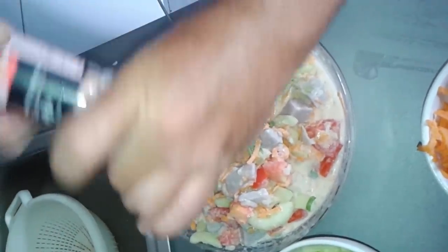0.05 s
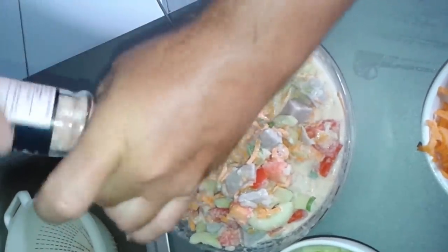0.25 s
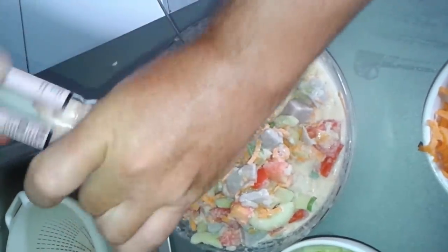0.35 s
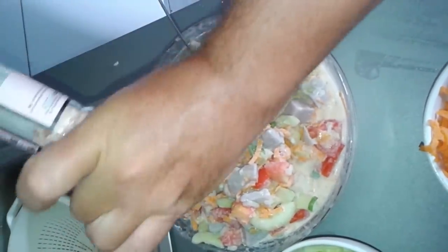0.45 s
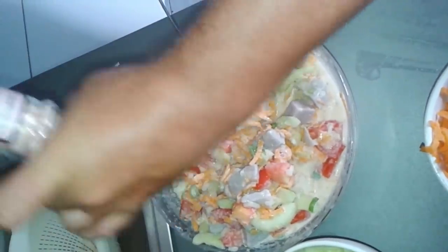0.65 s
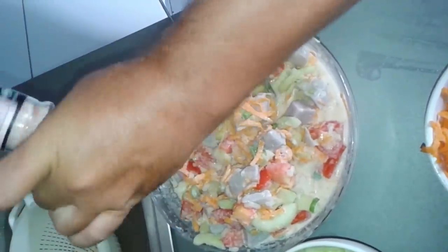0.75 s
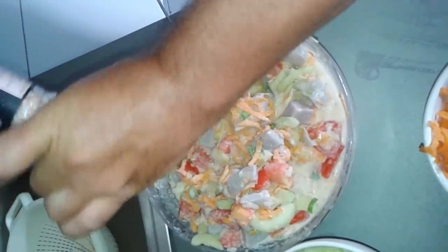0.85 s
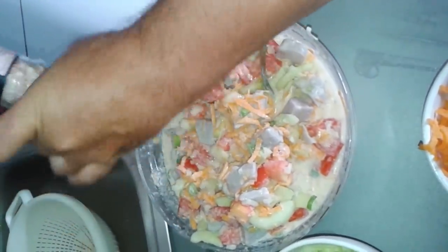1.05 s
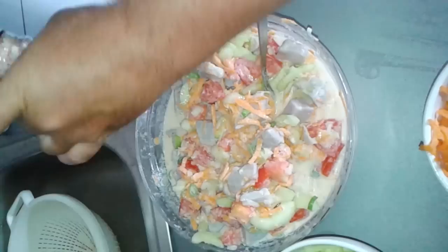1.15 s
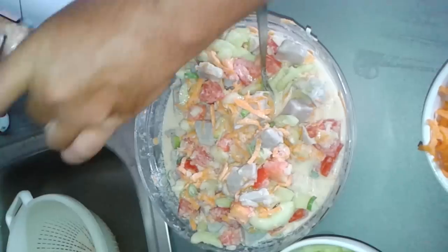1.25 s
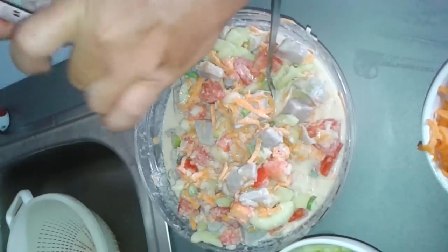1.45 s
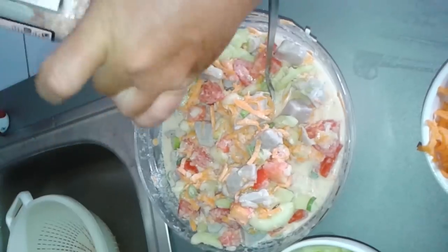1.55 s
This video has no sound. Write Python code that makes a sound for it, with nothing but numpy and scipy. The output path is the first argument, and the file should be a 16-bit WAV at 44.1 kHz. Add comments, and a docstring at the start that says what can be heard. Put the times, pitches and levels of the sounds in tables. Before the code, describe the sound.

A hand salt grinder crunches close by in three short twists, at about 0.2, 0.7 and 1.1 seconds. Each is a gritty rasp of roughly a quarter second, with coarse crystals cracking in the plastic head. Faint finger taps and ticks of loose crystals come at the start, between twists and around 1.5 seconds. The kitchen rings briefly over a soft, low appliance hum.

```python
"""Salt grinder in a tiled kitchen

A hand grinder is twisted three times over a bowl, close by. In each twist the burr crushes a stream
of grit and a few coarse crystals crack; both ring the plastic head. Between twists fingers tap and
loose crystals tick in the jar. The room rings for half a second over a low appliance hum."""
import sys
import numpy as np
from scipy import signal
from scipy.fft import rfft, irfft, next_fast_len
from scipy.io import wavfile
from scipy.ndimage import map_coordinates

SR = 44100
rng = np.random.default_rng(int(sys.argv[2]) if len(sys.argv) > 2 else 0)


def persist_wave(psi):
    """Save psi, clipped to +-1, as 16-bit WAV."""
    counts = np.round(np.clip(psi, -1, 1) * 32767).astype(np.int16)
    wavfile.write(sys.argv[1], SR, np.atleast_2d(counts).T)


N = 70560
PREROLL = SR // 2  # samples


def amp(db):
    """Decibels to gain."""
    return 10 ** (np.asarray(db) / 20)


def unit(x):
    """Scale to rms 1."""
    return x / np.sqrt(np.mean(x ** 2) + 1e-20)


def along(points, hz):
    """Interpolate (f/Hz, value) points on a log frequency axis."""
    f, v = np.transpose(points)
    return np.interp(np.log(hz + 1), np.log(f + 1), v)


def wobble(knots_per_s, size):
    """Smooth random curve."""
    knots = rng.standard_normal(int(size * knots_per_s / SR) + 4)
    return map_coordinates(knots, [np.arange(size) * knots_per_s / SR])


def filtered(x, response):
    """Zero-phase filter with gain response(hz)."""
    m = next_fast_len(N + SR // 2)
    return irfft(rfft(x, m) * response(np.fft.rfftfreq(m, 1 / SR)), m)[..., :N]


def add(track, start_s, x):
    """Mix x into a track that begins PREROLL early."""
    i = round(start_s * SR) + PREROLL
    track[i:i + len(x)] += x[:len(track) - i]


# Room noise spectrum: f/Hz, relative density/dB
NOISE_SPECTRUM = [(25, -15.5), (100, -8), (135, -3), (250, -2), (460, -13.5), (800, -15.5), (1300, -20),
                  (2300, -17), (4500, -27.5), (6800, -19), (8500, -23.5), (15000, -32)]

def room_noise(level_db=-53):
    """Soft, steady noise, strongest in the bass."""
    noise = filtered(rng.standard_normal(N), lambda hz: amp(along(NOISE_SPECTRUM, hz)))
    return amp(level_db) * unit(noise)


# Hum partials: f/Hz, level/dB
HUM_PARTIALS = [(153, -58), (265, -63)]

def appliance_hum(drift_rad=0.26, waver_db=3):
    """Two low tones wavering in phase and level."""
    t = np.arange(N) / SR
    out = np.zeros(N)
    for hz, db in HUM_PARTIALS:
        tone = np.sin(2 * np.pi * hz * t + drift_rad * wobble(32, N))
        out += amp(db) * unit(tone * amp(waver_db * wobble(13.96, N)))
    return out


# Room decay: f/Hz, T60/s
KITCHEN_DECAY = [(200, 0.9), (900, 0.56), (2200, 0.43), (6000, 0.41), (10000, 0.33), (15000, 0.21)]

def kitchen(x, room_db=-5, onset_s=0.0062, near_db=-1.5, near_s=0.0046):
    """Direct sound, scatter off hands, bowl and worktop, room tail; new paths as the grinder moves."""
    hz, frame_s, spectra = signal.stft(rng.standard_normal(SR // 2), SR, nperseg=256)
    decay = amp(-60 * frame_s / along(KITCHEN_DECAY, hz)[:, None])
    tail = signal.istft(spectra * decay, SR)[1]
    t = np.arange(len(tail)) / SR
    tail *= 1 - np.exp(-t / onset_s)
    near = rng.standard_normal(len(t)) * np.sqrt(t) * np.exp(-t / near_s)
    response = amp(room_db) * tail / np.linalg.norm(tail) + amp(near_db) * near / np.linalg.norm(near)
    response[0] = 1  # direct path
    return signal.fftconvolve(x, response)


# Jar modes: f/Hz, relative level/dB, T60/s
JAR_RINGS = [(5760, 3, 0.022), (6905, 2.5, 0.041)]
# Crystal contacts: t/s, relative level/dB
JAR_TICKS = [(0.06, -49), (0.122, -46), (.133, -45.5), (.174, -45.5), (.185, -54), (0.194, -48), (0.6, -56),
             (0.624, -45), (0.632, -49), (0.644, -46), (1.06, -52.5), (1.476, -52), (1.507, -52),
             (1.516, -68), (1.557, -48.5), (1.575, -54)]

def loose_crystals(contact_s=0.0011, rough_rad=0.8, rough_per_s=650):
    """Crystals graze the jar and ring two high modes; unsteady contact jitters the phase."""
    out = np.zeros(N + SR)
    t = np.arange(SR // 20) / SR
    attack = 1 - np.exp(-t / contact_s)
    for start_s, db in JAR_TICKS:
        ring = np.zeros(len(t))
        for hz, mode_db, t60_s in JAR_RINGS:
            phase = 2 * np.pi * hz * t + rough_rad * wobble(rough_per_s, len(t))
            ring += amp(mode_db - 60 * t / t60_s) * np.sin(phase)
        add(out, start_s, amp(db) * kitchen(ring * attack))
    return out


# Broad response of head and jar: f/Hz, relative level/dB
HEAD_SPECTRUM = [(40, -50), (150, -30), (300, -18.5), (480, -24), (720, -32.5), (900, -19), (1300, -10.5),
                 (1800, -5.5), (2300, -1), (2900, -4.5), (3800, -4.5), (4700, -8), (5700, -3), (7500, -6.5),
                 (8600, -9), (9800, -7), (11500, -16), (14500, -19.5)]
# Head resonances: f/Hz, width/Hz, relative level/dB
HEAD_MODES = [(1700, 30, -1), (2844, 180, -8), (3430, 1200, -20.5), (5360, 380, -10), (6300, 540, -5),
              (7530, 480, -1.5)]
# Brightness shelf: f/Hz, share of bright_db
BRIGHT_SHARE = [(2500, 0.1), (4000, 0.19), (7000, 0.82)]
# Top-octave shelf: f/Hz, share of sparkle_db
SPARKLE_SHARE = [(6500, 0.11), (10000, 1)]
# Cupped-hand peak: f/Hz, share of hollow_db
HOLLOW_SHARE = [(400, 0.17), (1000, 1), (1700, 0.095), (2500, 0.053)]

def plastic_head(bright_db, sparkle_db, hollow_db, pitch_hz, width_hz=415, peak_db=-2.5, size=2048):
    """Impulse response of the grinder; the grip sets its main resonance, pitch_hz."""
    hz = np.fft.rfftfreq(size, 1 / SR)
    modes = HEAD_MODES + [(pitch_hz, width_hz, peak_db)]
    peaks = sum(amp(db) / (1 + (2 * (hz - f) / width) ** 2) for f, width, db in modes)
    gain = unit(amp(along(HEAD_SPECTRUM, hz)) * (1 + peaks))
    tone_db = (bright_db * along(BRIGHT_SHARE, hz) + sparkle_db * along(SPARKLE_SHARE, hz)
               + hollow_db * along(HOLLOW_SHARE, hz))
    cepstrum = irfft(np.log(gain * amp(tone_db)))
    cepstrum[1:size // 2] *= 2  # fold to minimum phase
    cepstrum[size // 2 + 1:] = 0
    return irfft(np.exp(rfft(cepstrum)))


def snaps(events, hold_s=0.0019, fade_s=0.0005):
    """Brief noise bursts ring the head at the pitch of the nearest twist."""
    out = np.zeros(N + SR)
    t = np.arange(SR // 100) / SR
    envelope = np.exp(-np.maximum(t - hold_s, 0) / fade_s)
    for start_s, db, bright_db, sparkle_db, hollow_db in events:
        burst = rng.standard_normal(len(t)) * envelope
        for _ in range(6):  # flatten the spectrum: a brittle break excites all frequencies evenly
            burst = irfft(np.exp(1j * np.angle(rfft(burst))), len(t)) * envelope
        burst *= np.linalg.norm(envelope) / np.linalg.norm(burst)
        *_, pitch_hz = min(TWIST_STROKES, key=lambda stroke: abs(stroke[0] - start_s))
        body = plastic_head(bright_db, sparkle_db, hollow_db, pitch_hz)
        add(out, start_s, amp(db) * kitchen(signal.fftconvolve(burst, body)))
    return out


# Taps: t/s, relative level/dB, brightness/dB, sparkle/dB, hollowness/dB
FINGER_TAPS = [(.01, -40, 4, -1, -11), (.031, -36.5, -7, 4, 3), (.059, -42, -19, -3, 16),
               (.111, -50, -8, 5, 0), (.156, -36, -13, 0, 3), (.598, -41, -9, 1.5, 3),
               (1.069, -41.5, -11, -4, 1), (1.513, -70, 3, 0, 2), (1.563, -44.5, 4, -9, -15),
               (1.576, -51, 13, -14, 5)]

def finger_taps():
    """Fingers knock the grinder as they regrip."""
    return snaps(FINGER_TAPS)


# Strokes of the head; the first ends before t = 0, the next two form one twist:
# start/s, full grip/s, release/s, relative level at grip/dB and at release/dB,
# brightness/dB, hollowness/dB, head pitch/Hz
TWIST_STROKES = [(-.26, -0.214, -0.085, -24, -22.5, 0.5, -5, 2080),
                 (0.209, 0.281, 0.346, -20, -23, -2.5, -5.5, 2370),
                 (0.346, 0.36, 0.477, -26, -42.5, -23, -2, 2430),
                 (0.683, 0.695, 0.831, -19, -31.5, -1.5, 5, 2076),
                 (1.12, 1.152, 1.331, -24, -33, 0.5, 2, 2340)]

def grit(grains_per_s=1100, grain_s=0.00045, spread_db=3, rise_db=17.5, fade_s=0.0064):
    """The burr crushes a stream of grains that swells as the grip tightens and dies on release."""
    out = np.zeros(N + SR)
    t = np.arange(SR // 3) / SR
    for start_s, grip_s, release_s, grip_db, release_db, bright_db, hollow_db, pitch_hz in TWIST_STROKES:
        breaks = rng.random(len(t)) < grains_per_s / SR
        sizes = breaks * amp(spread_db * np.clip(rng.standard_normal(len(t)), -2, 2))
        power = signal.lfilter([1], [1, -np.exp(-2 / (grain_s * SR))], sizes ** 2)
        grains = unit(np.sqrt(power) * rng.standard_normal(len(t)))
        levels_db = [grip_db - rise_db, grip_db, release_db]
        effort = amp(np.interp(start_s + t, [start_s, grip_s, release_s], levels_db))
        effort *= np.exp(-np.maximum(start_s + t - release_s, 0) / fade_s)
        body = plastic_head(bright_db, 0, hollow_db, pitch_hz)
        add(out, start_s, kitchen(signal.fftconvolve(grains * effort, body)))
    return out


# Cracks: t/s, relative level/dB, brightness/dB, sparkle/dB, hollowness/dB
CRYSTAL_CRACKS = [(.208, -37.5, 2, 5, 5), (.2174, -14.5, -33, -9, -11), (.2225, -31, 2, -2, -12),
                  (.2325, -23.5, -2.5, 1, -11), (.2468, -31, -7, 1, -6), (.252, -43, 2, 1, -9),
                  (.2605, -14, -11, 1, -11), (.2685, -9, -0.5, -8, -4.5), (.2744, -10, -0.5, 2, -2.5),
                  (.2972, -14, -2.5, 3, -17), (.309, -27, -9, -2, -7), (.3325, -23, -8, 11, -8),
                  (.366, -17, 8, -5.5, 0), (.382, -16, -5, -22, 1.5), (.6694, -19.5, 13, -4, 1),
                  (.676, -24, -8, 10, 9), (.6915, -32.5, 23, -10, 10), (.699, -21.5, 5.5, 2, 9),
                  (.7035, -25.5, 15, -3.5, 15), (.7172, -20, 10, -6, 1), (.733, -28, 14.5, -7.5, -12),
                  (.740, -24, 4, 7, 5), (.764, -26.5, 20, 1, 1), (.7688, -22.5, 13, 2, -7),
                  (.8044, -22.5, -5, 18.5, -11), (.8135, -18, -11, -3, -4), (1.1235, -36, -11, -7, 0),
                  (1.1375, -46, 0, 10, 2), (1.1535, -36, -2, -2, -4), (1.174, -18, 3.5, 4.5, 6),
                  (1.1835, -31, -10, -4, 4), (1.1938, -29, -1, 7.5, -17), (1.209, -18, -7, 6, 13),
                  (1.2152, -14.5, -3, 1, -7), (1.2718, -18, 3.5, 8.5, -11)]

def crystal_cracks():
    """Coarse crystals break in the burr, each crumbling for about 2 ms."""
    return snaps(CRYSTAL_CRACKS)


def scene():
    """Grinder over room noise and hum, centred."""
    grinder = amp(-2.5) * grit() + amp(-1) * crystal_cracks()
    grinder += amp(-3) * finger_taps() + amp(1.5) * loose_crystals()
    mono = grinder[PREROLL:PREROLL + N] + room_noise() + appliance_hum()
    return np.array([mono, mono])


def record(dry, cutoff_hz=14600):
    """Steep low-pass."""
    return filtered(dry, lambda hz: 1 / np.sqrt(1 + (hz / cutoff_hz) ** 200))


dry = scene()
out = record(dry)
persist_wave(out)
```